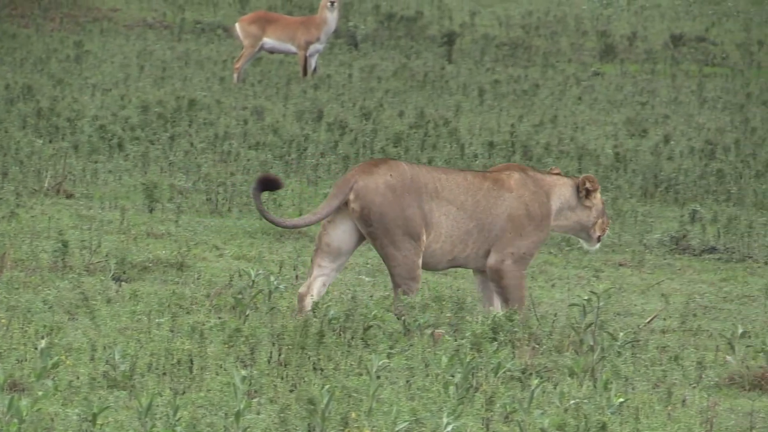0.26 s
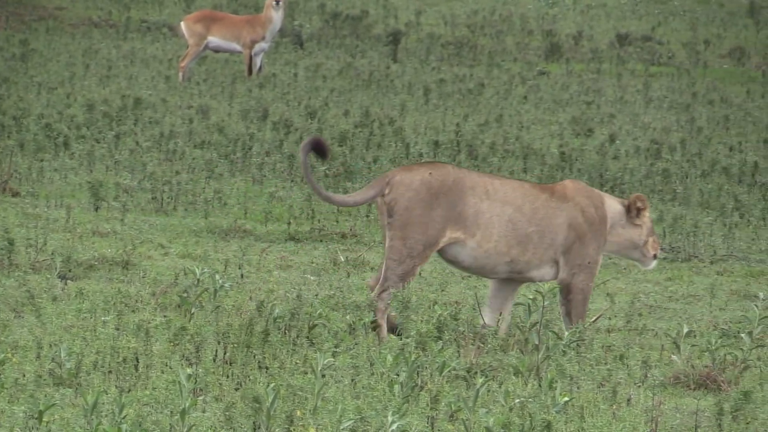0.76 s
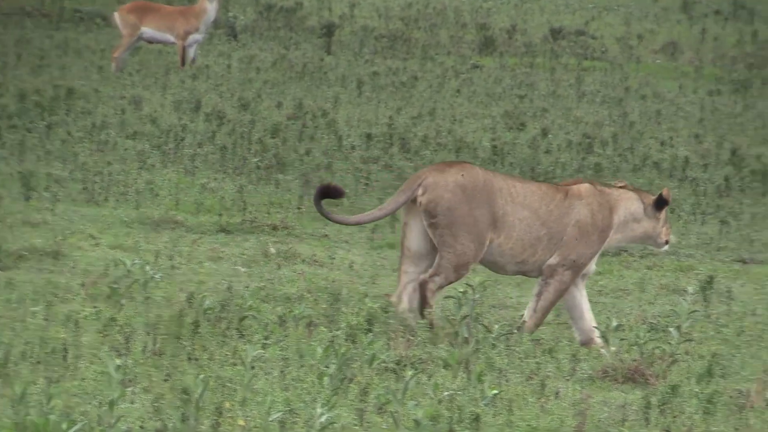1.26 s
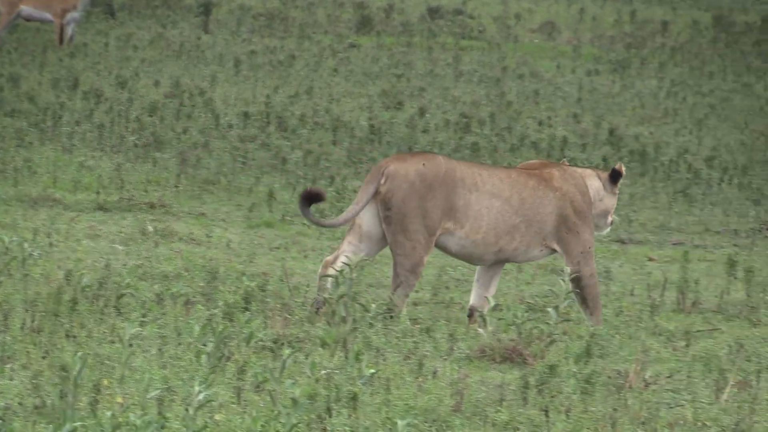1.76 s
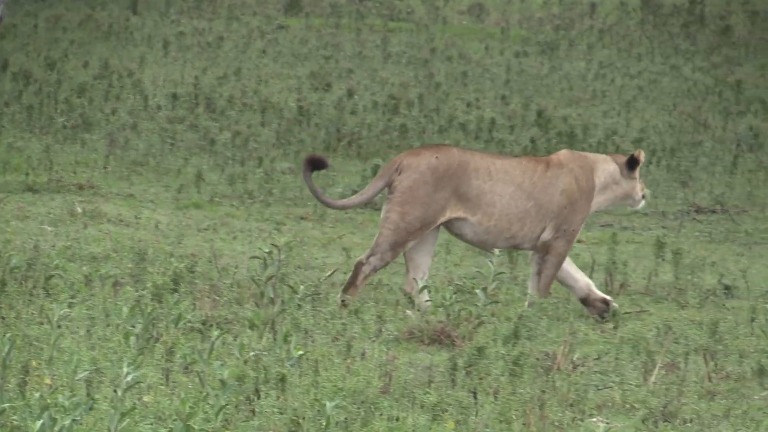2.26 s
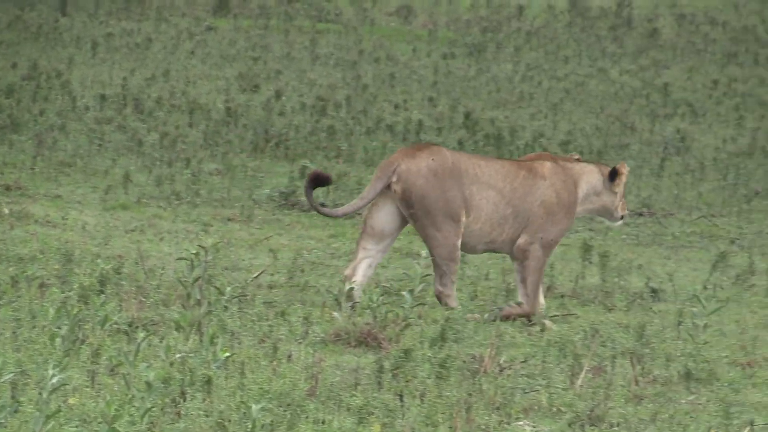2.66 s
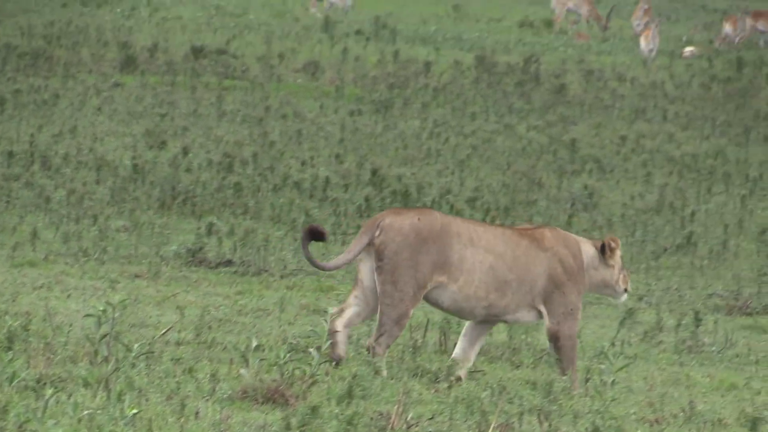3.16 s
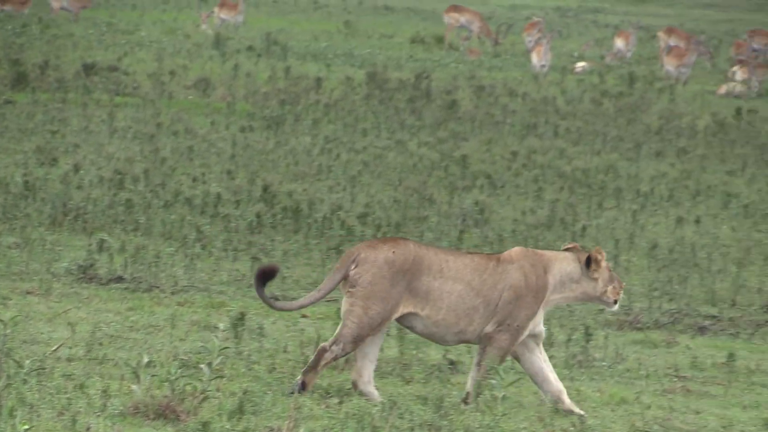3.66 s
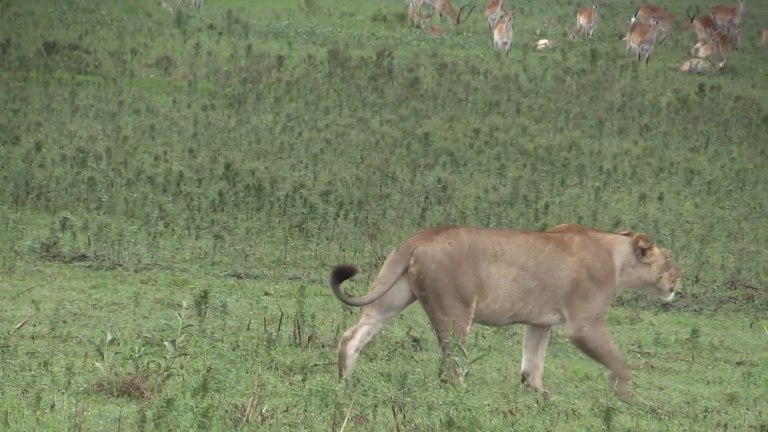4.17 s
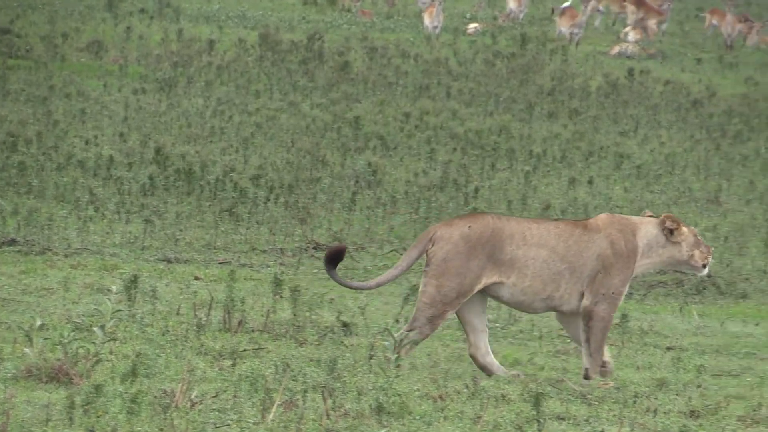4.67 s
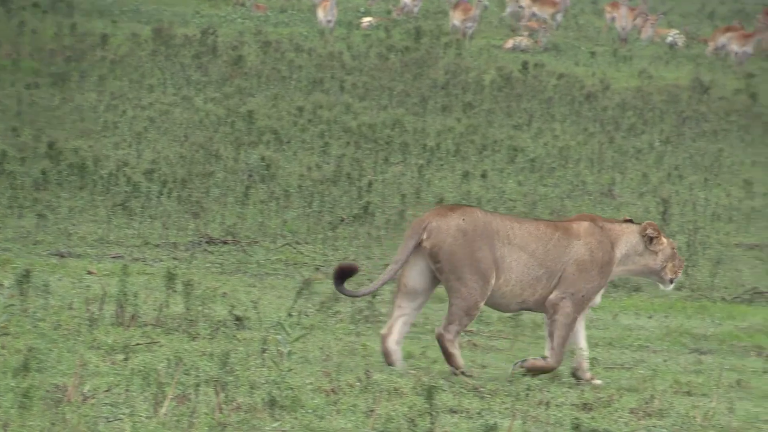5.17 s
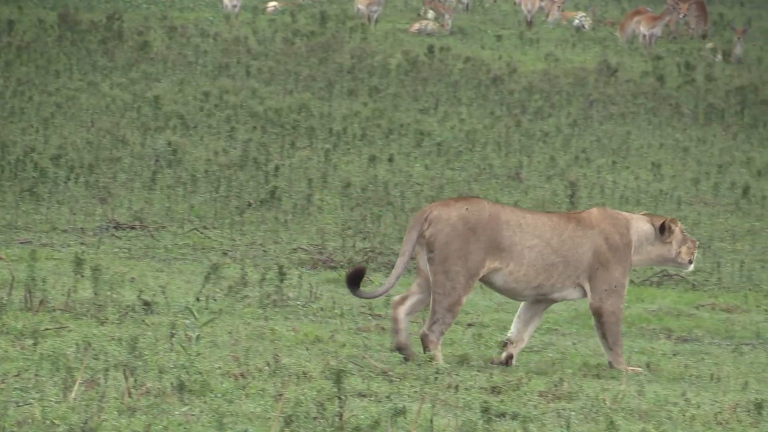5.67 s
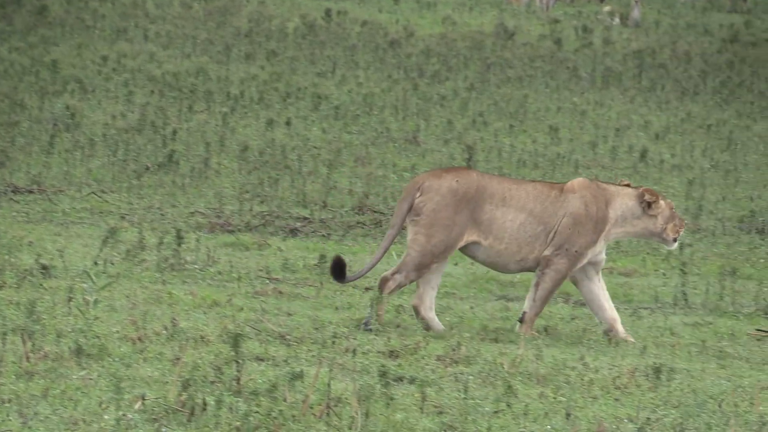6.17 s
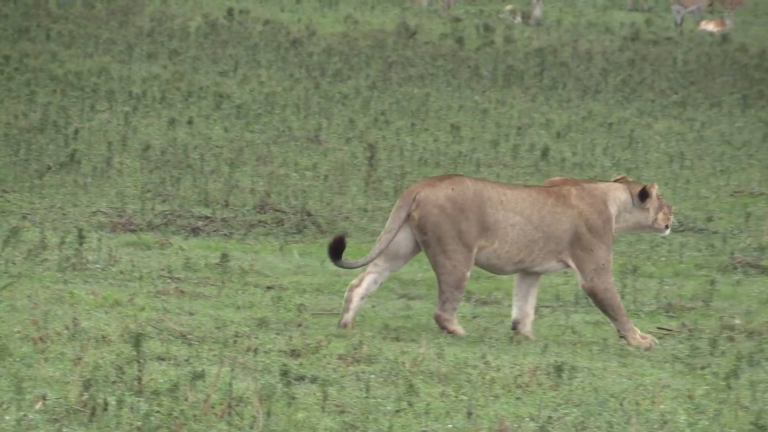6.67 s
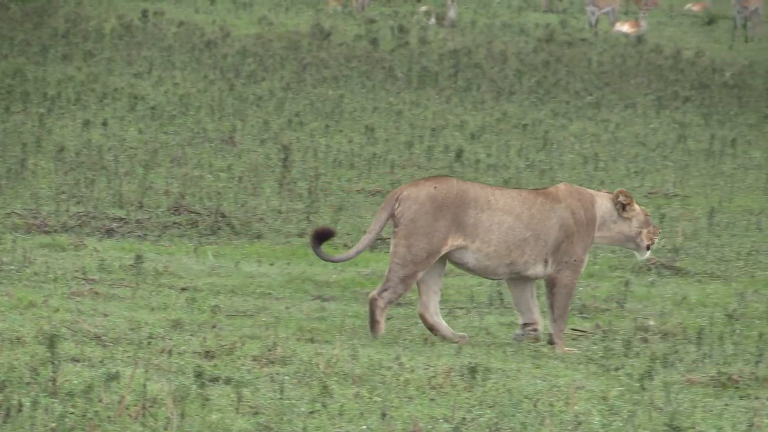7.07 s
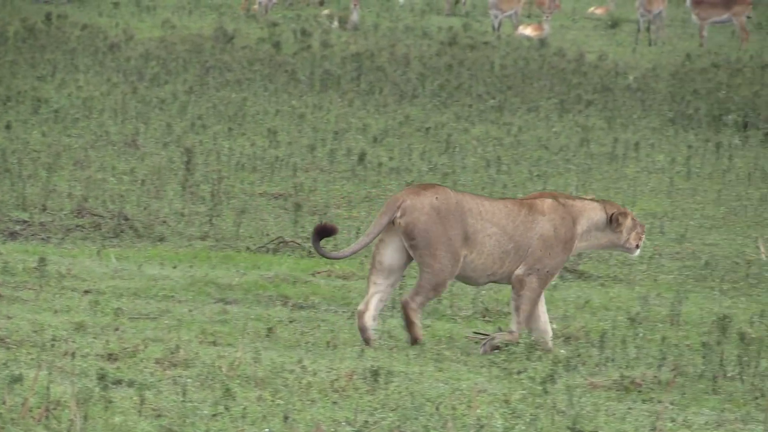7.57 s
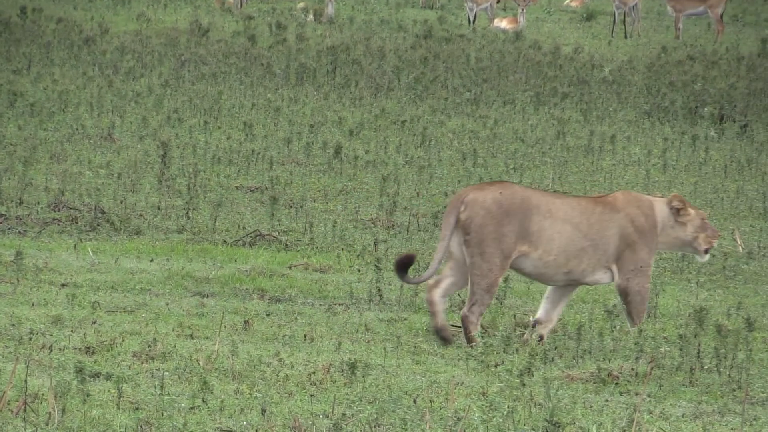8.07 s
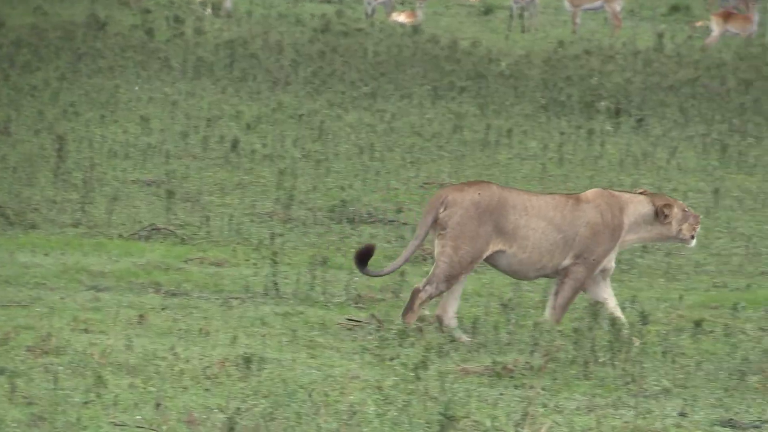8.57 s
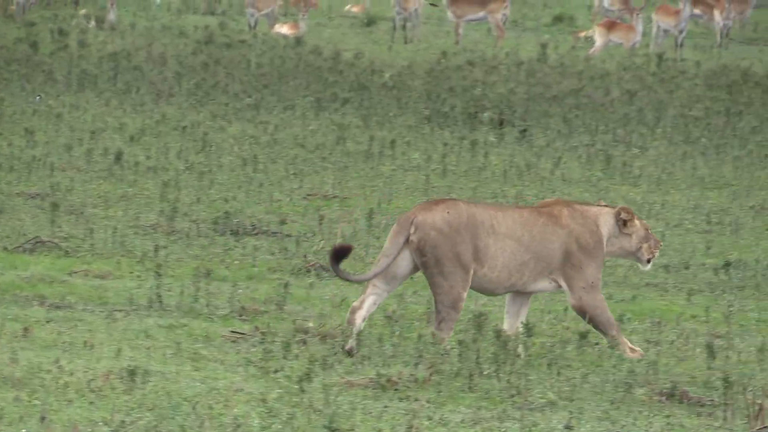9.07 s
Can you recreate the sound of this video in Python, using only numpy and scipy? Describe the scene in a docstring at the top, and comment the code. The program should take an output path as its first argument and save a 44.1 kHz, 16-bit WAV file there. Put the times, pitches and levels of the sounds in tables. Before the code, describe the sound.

Short, low lion grunts come about once a second in quiet open grassland, each fraying into a rasp.

```python
"""Lion grunting over grassland

A lion gives eight deep grunts, the tail end of a roar. Each starts as a short hum, catches, swells to
an almost pure low note and frays into a hoarse rattle as the heavy vocal folds run out of air, while
breath rasps through the long throat. Around it: faint low echoes, a few dry clicks, a low creak,
bird chirps, a high trilling cricket and a soft hush of air."""
import sys
import numpy as np
from scipy import signal
from scipy.fft import rfft, irfft, next_fast_len
from scipy.io import wavfile
from scipy.ndimage import map_coordinates

SR = 44100
rng = np.random.default_rng(int(sys.argv[2]) if len(sys.argv) > 2 else 0)


def file_out(sig):
    """Save sig as 16-bit WAV at sys.argv[1]."""
    # one column per channel
    cols = np.atleast_2d(sig).T
    # limit, then scale
    lim = np.clip(cols, -1, 1)
    pcm = np.round(lim * 32767).astype(np.int16)
    wavfile.write(sys.argv[1], SR, pcm)


N = 411453
RING_ON_S = .105  # how long the note outlasts the push of air


def lion():
    """A run of eight grunts, sitting a little left of centre."""
    # Each row: time of the catch in seconds; hum before it in seconds; ends of the swell, the clear
    # note and the push of air in seconds after it; note level in dB; note and hum pitch in Hz; dip at
    # the catch in dB; fade of the frayed note in dB per second; rasp, hiss and chest levels in dB;
    # factor on the throat resonances; brightness lift, jaw resonance level and mouth lift in dB.
    grunts = [ (.995, 0.095, 0.065, 0.28, 0.34, -16, 157.3, 172.8, 5, -135, -41.5, -56, -50.5, 0.96, -2.5, -51, -1.5),
              (2.289, 0.087, 0.067, 0.2, 0.31, -16, 155, 169.4, 8, -93.5, -42.5, -59.5, -43, 0.95, -4.5, -57, 0),
              (3.378, 0.067, .08, 0.16, 0.28, -14.5, 155.8, 156.5, 8, -100, -42, -54, -45, 0.97, 1.5, -54, -0.5),
              (4.466, .069, .072, 0.17, 0.27, -15.5, 158.2, 160.1, 9.5, -115, -40, -50.5, -45, 0.97, 1, -48.5, 1),
              (5.572, .066, .08, 0.15, 0.25, -16, 154.4, 152, 9.5, -80.5, -41, -51.5, -44.5, 0.97, 1, -52.5, 1.5),
              (6.547, .072, 0.085, 0.18, .262, -15.5, 152.7, 160, 16.5, -135, -44, -52, -49.5, 0.95, 4, -50, 4),
              (7.58, 0.069, 0.064, 0.16, .236, -15, 156.5, 161.3, 17, -130, -40.5, -54.5, -48, .98, -0.5, -50.5, 0),
              (8.632, 0.061, 0.095, 0.15, .25, -16, 152.3, 146.1, 7.5, -115, -39.5, -53, -45, .995, -1, -49, -1)]
    # Each row: frequency in Hz, left minus right in dB.
    balance = [(60, -1.5), (130, 0.5), (290, 1.0), (640, 4.5), (1410, 3.5), (3100, 0), (6820, 0),
               (15000, 1.5)]
    # Each row: frequency in Hz, phase lead of the left side in radians.
    left_lead = [(150, 0.14), (450, 0.13), (900, -.1), (2300, -0.4), (4500, -0.053)]
    out = np.zeros((2, N))
    for row in grunts:
        add(out, *grunt(*row))
    return placed(out, balance, left_lead)


def grunt(catch_s, hum_s, swell_s, clear_s, push_s, level_db, note_hz, hum_hz, catch_db, fade_db_per_s,
          rasp_db, hiss_db, chest_db, throat_factor, bright_db, jaw_db, mouth_db):
    """One push of air sounds the folds, throat, jaw and chest; returns the start time and the sound."""
    t = np.arange(-hum_s, push_s + RING_ON_S, 1 / SR)  # zero at the catch of the voice
    pitch = note_pitch(t, hum_hz, note_hz, clear_s, push_s)
    note, phase = vocal_folds(t, pitch, swell_s, clear_s, catch_db)
    voice = gain_of(level_db) * note_gain(t, hum_s, swell_s, clear_s, push_s, fade_db_per_s) * note
    opening = np.clip((t + hum_s) / (clear_s + hum_s), 0, 1)  # the mouth opens until the note frays
    resonances = throat(throat_factor, bright_db, mouth_db)
    flow = airflow(t, hum_s, clear_s, push_s)
    escaping_air = flow * breath(phase, opening, resonances, rasp_db, hiss_db)
    jaw = gain_of(jaw_db) * jaw_resonance(opening)
    chest = gain_of(chest_db) * chest_puff(t, push_s)
    return catch_s - hum_s, (voice + escaping_air + jaw + chest) * signal.windows.tukey(len(t), .08)


def vocal_folds(t, pitch, swell_s, clear_s, catch_db):
    """Heavy folds swing almost as a sine, then flap irregularly; returns the note and its phase."""
    # Spectrum of the flapping. Each row: frequency in Hz, relative level in dB.
    flutter_spectrum = [(40, -68.5), (75, -35.5), (105, -13.5), (135, 0), (158, -5), (190, 4), (225, -4.5),
                        (270, -28), (400, -47), (1500, -120)]
    count = len(t)
    catch = np.exp(-(t / .0098) ** 2)  # the level dips and the pitch flicks upward
    frayed = .5 + .5 * np.tanh((t - clear_s) / .042)
    jitter = (.011 + .07 * frayed) * wander(count, 55) + .007 * wander(count, 14)
    phase = phase_of(pitch * (1 + jitter + .092 * catch))
    octave_db = -30.5 - 13 * eased(t / swell_s)  # the tone grows purer as it swells
    tone = np.sin(phase) + gain_of(octave_db) * np.sin(2 * phase) + gain_of(-42) * np.sin(3 * phase)
    flutter = coloured(rng.standard_normal(count), flutter_spectrum)
    roughness = .075 + .55 * frayed
    note = np.sqrt(2 * (1 - roughness ** 2)) * tone + roughness * flutter  # equal-power blend
    throb_db = frayed * wander(count, 40)
    return gain_of(throb_db - catch_db * catch) * note, phase


def note_pitch(t, hum_hz, note_hz, clear_s, push_s):
    """A rising hum settles on an almost level note that sinks as the air ends."""
    rise_hz_per_s, creep_hz_per_s, sink_hz_per_s = 290, 25, 380
    settle_s, sink_lead_s = .014, .025
    settled = .5 + .5 * np.tanh((t - settle_s / 2) / settle_s)
    hum = hum_hz + rise_hz_per_s * np.minimum(t, 0)
    note = note_hz + creep_hz_per_s * (np.minimum(t, clear_s) - clear_s / 2)
    sink = sink_hz_per_s * np.maximum(t - push_s + sink_lead_s, 0)
    return (1 - settled) * hum + settled * note - sink


def note_gain(t, hum_s, swell_s, clear_s, push_s, fade_db_per_s):
    """A soft hum swells after the catch, slowly tires, drops as it frays and fades out."""
    attack_s, break_s, stop_s = .079, .0095, .11
    swell_db = -6.5 * (1 - eased(t / swell_s))
    tire_db = -3 * np.clip(t / clear_s, 0, 1) ** 4
    break_db = -7 * (.5 + .5 * np.tanh((t - clear_s) / break_s))
    fade_db = fade_db_per_s * np.maximum(t - clear_s, 0)
    gate = eased((t + hum_s) / attack_s) * eased((push_s + RING_ON_S - t) / stop_s)
    return gate * gain_of(swell_db + tire_db + break_db + fade_db)


def throat(factor, bright_db, mouth_db):
    """The long throat's resonances, tuned for one grunt, plus broad brightness and mouth peaks."""
    # Each row: centre in Hz, width in Hz, lift in dB.
    resonances = [(436, 54, 7), (548, 33, 9), (723, 55, 8), (905, 58, 7.5), (1071, 43, 6.5), (1180, 130, 7),
                  (1326, 70, 4), (1384, 19, 7.5), (1684, 79, 7), (1930, 63, 5), (2118, 65, 7.5),
                  (2370, 150, 4.5), (2764, 34, 9), (2970, 130, 9.5), (3180, 68, 6), (3490, 42, 8),
                  (4700, 200, -2.5), (5140, 200, 2), (5180, 260, 4)]
    tuned = [(hz * factor, width, lift) for hz, width, lift in resonances]
    return tuned + [(2100, 1200, bright_db), (1170, 180, mouth_db)]


def airflow(t, hum_s, clear_s, push_s):
    """The air builds from the start of the hum, sags once the note frays and is shut off."""
    attack_s, release_s, sag_db_per_s = .16, .024, -31.5
    attack = eased((t + hum_s) / attack_s) ** .73
    sag = gain_of(sag_db_per_s * np.maximum(t - clear_s, 0))
    return attack * sag / (1 + np.exp((t - push_s) / release_s))


def breath(phase, opening, resonances, rasp_db, hiss_db):
    """Uneven puffs of air rasp in the throat and hiss at the teeth, louder as the mouth opens."""
    # Spectra of the rasp and the hiss. Each row: frequency in Hz, relative level in dB.
    rasp_spectrum = [(40, -60.5), (150, -26.5), (230, 11.5), (280, 7), (350, 0), (600, -6), (1200, -5.5),
                     (1900, -12), (2500, -15.5), (3500, -28.5), (6000, -46), (12000, -100)]
    hiss_spectrum = [(1000, -32), (2000, -1.5), (2800, -0.5), (3800, -1), (4600, -5), (5600, -6),
                     (6500, -13), (8000, -16.5), (10000, -28.5), (14000, -45)]
    # Each row: frequency in Hz, left-right correlation.
    likeness = [(150, 0.97), (600, 0.97), (1500, 0.95), (3000, .84), (7000, 0.99)]
    count = len(phase)
    puffs = (1 + .099 * np.cos(phase)) * gain_of(1.8 * wander(count, 91))
    rasp = coloured(puffs * reflected(noise_pair(count, likeness)), rasp_spectrum, resonances)
    hiss = coloured(puffs * reflected(noise_pair(count, likeness)), hiss_spectrum, resonances)
    rasp *= gain_of(rasp_db - 2.9 * (1 - opening))
    hiss *= gain_of(hiss_db - 12 * (1 - opening))
    arch = 1 + .025 * np.sin(np.linspace(0, np.pi, count))  # the rasp's resonances rise and fall back
    return bent(rasp, arch) + hiss


def jaw_resonance(opening):
    """One narrow band of noise arches up and down in pitch as the jaw opens and closes."""
    count = len(opening)
    gape = np.sin(np.pi * opening ** 1.3)
    phase = phase_of(388 + 78 * gape)
    return gape * (wander(count, 9.6) * np.cos(phase) + wander(count, 10) * np.sin(phase))


def chest_puff(t, push_s):
    """The chest empties with a low puff just before the push of air ends."""
    # Each row: frequency in Hz, relative level in dB.
    spectrum = [(25, -24), (45, -12.5), (62, 1), (78, -3), (100, 2), (125, 17), (170, -15), (300, -37),
                (1500, -110)]
    lead_s, spread_s = .027, .095
    swell = np.exp(-((t - push_s + lead_s) / spread_s) ** 2)
    return swell * coloured(rng.standard_normal(len(t)), spectrum)


def ground_scatter(pair):
    """The ground and bushes scatter a diffuse tail; the bass lingers longest."""
    # Each row: frequency in Hz, seconds to fall by 60 dB.
    decay_times = [(150, 1.09), (400, 0.74), (1500, 0.56), (6000, 0.15)]
    noise = rng.standard_normal(SR) + .5 * rng.standard_normal((2, SR))
    hz, t, spectra = signal.stft(noise, SR, nperseg=512)
    decay = gain_of(-60 * t / read(decay_times, hz)[:, None])
    tail = signal.istft(spectra * decay, SR, nperseg=512)[1]
    return signal.fftconvolve(pair, tail / np.linalg.norm(tail[0]), axes=1)[:, :N]


def echoes(note_hz=156, trim_db=-5):
    """Only the deep note comes back from afar: a quick swell and a slow fade."""
    # Each row: start in seconds, length in seconds, level in dB before the trim.
    returns = [(.04, 0.33, -52.5), (3.72, 0.25, -53), (4.8, 0.16, -53.5), (7.895, 0.24, -53)]
    out = np.zeros(N)
    for start, length, db in returns:
        u = np.linspace(0, 1, int(length * SR))
        tone = np.sin(phase_of(note_hz * (1 + .025 * wander(len(u), 30))))
        add(out, start, gain_of(db + trim_db) * evened(np.sin(np.pi * u ** .5) ** 2 * tone))
    return out


def clicks():
    """Each dry click is a bright snap and a brief woody knock, scattered by nearby surfaces."""
    # Each row: start in seconds, knock gain in dB, snap gain in dB, factor on the knock's pitch.
    hits = [(0.971, -63, -48, 1.1), (2.2334, -32, -44.5, 1.03), (3.868, -43.5, -75, 0.46),
            (5.776, -33, -48, 1.04), (6.969, -47, -75, 0.53), (7.059, -38.5, -66, 1.04),
            (7.2866, -37, -42.5, 1.49), (8.155, -49, -75, 0.72), (8.934, -46, -77, 1.27),
            (9.127, -43.5, -72, 1.02)]
    # Modes of the knock. Each row: frequency in Hz, relative level in dB, seconds to fall by 60 dB.
    modes = [(1128, 2.5, 0.022), (1390, -2, 0.024), (1674, -2, 0.019), (1790, 1, 0.017), (2450, -15.5, .01),
             (2940, -9, 0.02)]
    snap_spectrum = [(500, -13), (2000, 1), (9000, -6.5), (15000, -22)]  # Hz, relative dB
    out, t = np.zeros((2, N)), np.arange(SR // 12) / SR
    for start, knock_db, snap_db, tuning in hits:
        ring = sum(gain_of(db - 60 * t / t60) * np.sin(2 * np.pi * (hz * tuning * t + rng.random()))
                   for hz, db, t60 in modes)
        snap = coloured(rng.standard_normal(len(t)), snap_spectrum) * np.exp(-t / .0014)
        click = gain_of(knock_db) * ring / 2 + gain_of(snap_db) * snap
        scatter = .03 * rng.standard_normal((2, len(t))) * np.exp(-t / .012)
        scatter[:, 0] = 1  # the direct sound
        add(out, start, signal.fftconvolve(click[None], scatter, axes=1))
    return out


def creak(start_s=5.232, length_s=.155, slips_per_s=75, db=-58):
    """A faint low creak: uneven slips that die away."""
    # Each row: frequency in Hz, relative level in dB.
    body = [(80, -15), (170, 6.5), (400, -7), (640, 4), (760, -14), (1500, -23), (4000, -60)]
    u = np.linspace(0, 1, int(length_s * SR))
    cycles = np.cumsum(slips_per_s * (1 + .4 * wander(len(u), 40))) / SR
    slips = np.exp(-(cycles % 1) / .37) * rng.standard_normal(len(u))
    fade = np.exp(-.6 * u) * signal.windows.tukey(len(u), .05)
    out = np.zeros(N)
    add(out, start_s, gain_of(db) * evened(coloured(slips, body) * fade))
    return out


def birds():
    """Short, faint, slightly hoarse notes that fall in pitch."""
    # Each row: start in seconds, length in seconds, pitch in Hz, level in dB.
    chirps = [(0.818, .035, 1790, -70), (0.885, 0.048, 1490, -61.5), (0.893, 0.039, 2080, -65),
              (3.894, 0.025, 6200, -70), (4.101, 0.021, 6400, -74)]
    out = np.zeros(N)
    for start, length, hz, db in chirps:
        u = np.linspace(0, 1, int(length * SR))
        glide = hz * (1 + .06 * (.5 - u) + .074 * wander(len(u), 700))
        add(out, start, gain_of(db) * evened(np.sin(np.pi * u) ** 2 * np.sin(phase_of(glide))))
    return out


def cricket():
    """Each wing stroke gives a thin high pulse that sags in pitch."""
    # Each row: start in seconds, end in seconds, strokes per second, level in dB.
    trills = [(0, 1.43, 26, -83.5), (1.874, 3.56, 24, -81.5), (4.283, 5.799, 18.8, -81),
              (6.595, 7.89, 19.1, -79.5)]
    out = np.zeros(N)
    for start, end, rate, db in trills:
        count = int((end - start) * SR)
        stroke = np.cumsum(rate * (1 + .029 * wander(count, 2))) / SR % 1
        hz = 8930 - 400 * stroke ** 2 + 170 * wander(count, 400)
        pulses = np.sin(np.pi * np.minimum(stroke / .82, 1)) * np.sin(phase_of(hz))
        add(out, start, gain_of(db) * evened(pulses) * signal.windows.tukey(count, .06))
    return out


def air(level_db=-58.5):
    """The wide hush of the plain, swelling a little."""
    # Each row: frequency in Hz, relative level in dB.
    spectrum = [(25, -27), (45, -18.5), (70, -15.5), (110, -16), (160, -5.5), (220, -11.5), (300, -12.5),
                (460, -14), (1020, -12), (1400, -16.5), (3500, -23), (8500, -30), (12000, -37.5),
                (15500, -38)]
    # Soft hums in the hush. Each row: centre in Hz, width in Hz, lift in dB.
    hums = [(155, 12, 9.5), (648, 92, 5.5)]
    # Each row: frequency in Hz, left-right correlation.
    likeness = [(60, .62), (160, .93), (350, .1), (630, .05), (1050, -.38), (2000, .17), (4200, .42),
                (8000, .54), (12000, .68)]
    # Each row: frequency in Hz, left minus right in dB.
    balance = [(60, -2.5), (150, 0.5), (380, 3.5), (950, 2.5), (2380, 1.5), (5980, 2.5), (15000, -0.5)]
    hush = coloured(noise_pair(N, likeness), spectrum, hums)
    return gain_of(level_db + .5 * wander(N, 1.6)) * placed(hush, balance)


def gain_of(db):
    """Decibels to a factor."""
    return 10 ** (np.asarray(db) / 20)


def phase_of(hz):
    """Running phase in radians of a moving pitch."""
    return 2 * np.pi * np.cumsum(hz) / SR


def evened(x):
    """Scales to rms 1."""
    return x / np.sqrt(np.mean(x ** 2) + 1e-20)


def eased(u):
    """A smooth step from 0 to 1 as u goes from 0 to 1."""
    return np.sin(np.pi / 2 * np.clip(u, 0, 1)) ** 2


def read(points, hz):
    """Reads a curve on a log-frequency axis."""
    f, value = np.transpose(points)
    return np.interp(np.log(hz + 1), np.log(f + 1), value)


def add(mix, start_s, sound):
    """Mixes a sound in at its start time."""
    part = mix[..., max(round(start_s * SR), 0):][..., :sound.shape[-1]]
    part += sound[..., :part.shape[-1]]


def wander(count, hz):
    """Smooth random drift of rms about 1, rolling off around hz."""
    size = next_fast_len(count + SR // 2)
    f = np.fft.rfftfreq(size, 1 / SR)
    return evened(irfft(rfft(rng.standard_normal(size)) * np.exp(-(f / hz) ** 2), size))[:count]


def coloured(x, slope, peaks=()):
    """Filters by a smooth slope with resonances on top; rms 1."""
    size = next_fast_len(x.shape[-1])
    hz = np.fft.rfftfreq(size, 1 / SR)
    db = read(slope, hz) + sum(lift * np.exp(-2 * ((hz - f) / width) ** 2) for f, width, lift in peaks)
    return evened(irfft(rfft(x, size) * gain_of(db), size)[..., :x.shape[-1]])


def noise_pair(count, likeness):
    """Stereo white noise, left and right partly alike."""
    size = next_fast_len(count)
    left, other = rfft(rng.standard_normal((2, size)))
    alike = np.clip(read(likeness, np.fft.rfftfreq(size, 1 / SR)), -1, 1)
    return irfft([left, alike * left + np.sqrt(1 - alike ** 2) * other], size)[:, :count]


def reflected(pair, taps_per_s=900):
    """Close reflections comb the sound finely."""
    t = np.arange(SR // 25) / SR
    taps = rng.standard_normal(len(t)) * (rng.random(len(t)) < taps_per_s / SR) * np.exp(-t / .02)
    taps *= .4 / np.linalg.norm(taps)
    taps[0] = 1  # the direct sound
    return signal.fftconvolve(pair, taps[None], axes=1)[:, :pair.shape[1]]


def bent(pair, ratio):
    """Shifts every resonance of a sound by a slowly moving ratio."""
    positions = np.cumsum(ratio / ratio.mean()) - 1
    return np.array([map_coordinates(x, [positions], order=3, mode="mirror") for x in pair])


def placed(pair, balance, lead=((0, 0),)):
    """Pans by frequency: one side gets the sound a little louder or sooner than the other."""
    size = next_fast_len(N)
    hz = np.fft.rfftfreq(size, 1 / SR)
    lean = gain_of(read(balance, hz) / 2) * np.exp(.5j * read(lead, hz))
    return irfft(rfft(pair, size) * [lean, 1 / lean], size)[:, :N]


def scene():
    """The lion in front of the small sounds of the grassland."""
    grunts = lion()
    tail = gain_of(-40.5) * ground_scatter(grunts)
    return grunts + tail + echoes() + air() + cricket() + clicks() + creak() + birds()


def record(dry, cutoff_hz=15800):
    """A steep low-pass trims the very top of the treble."""
    low_pass = signal.firwin(511, cutoff_hz, window=("kaiser", 9), fs=SR)
    return signal.oaconvolve(dry, low_pass[None], "same")


dry = scene()
out = record(dry)
file_out(out)
```